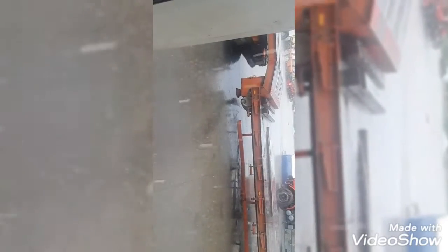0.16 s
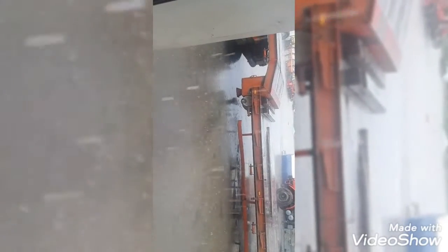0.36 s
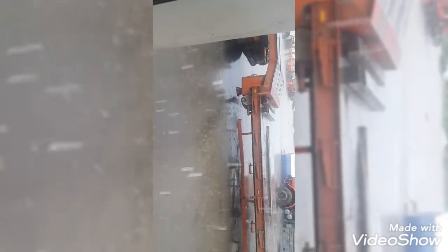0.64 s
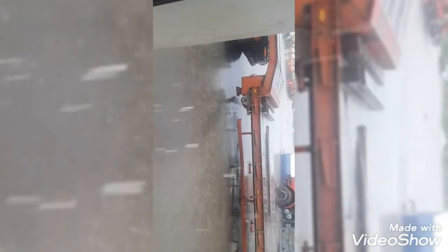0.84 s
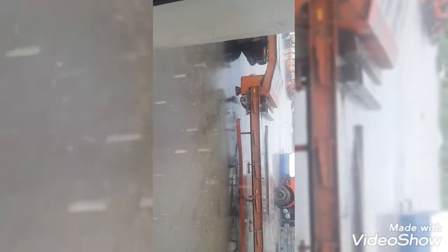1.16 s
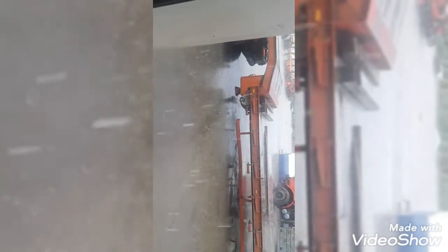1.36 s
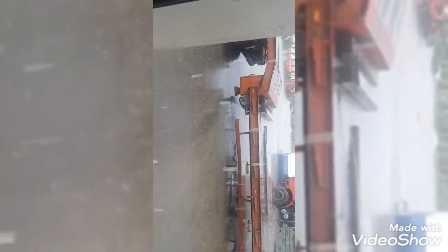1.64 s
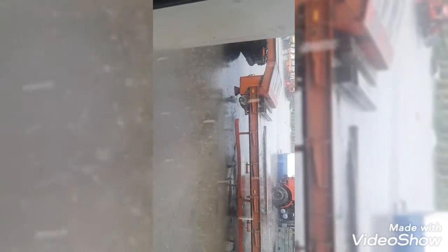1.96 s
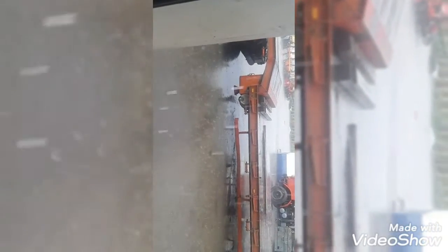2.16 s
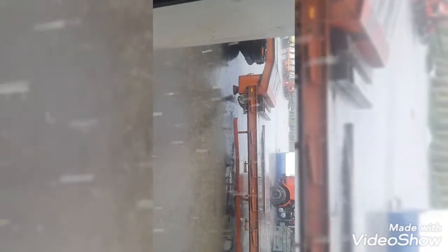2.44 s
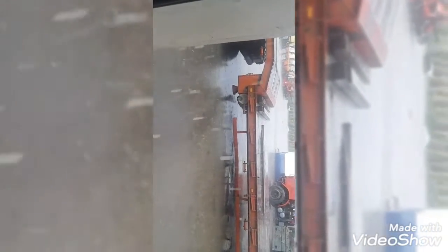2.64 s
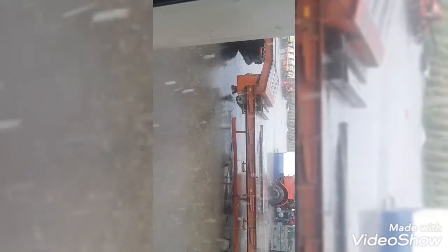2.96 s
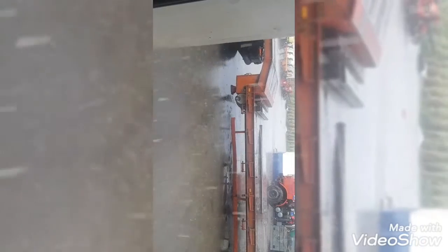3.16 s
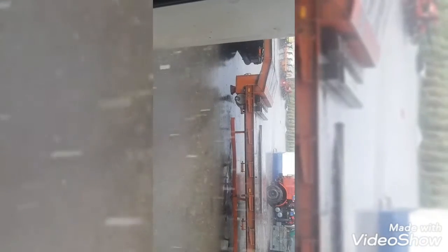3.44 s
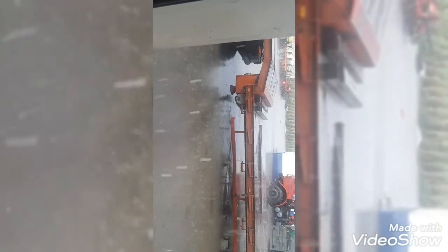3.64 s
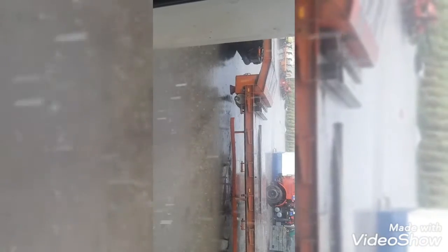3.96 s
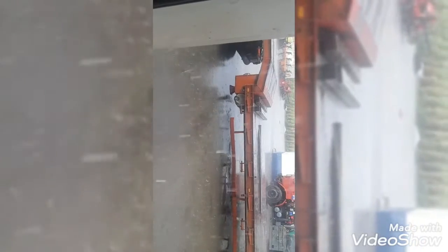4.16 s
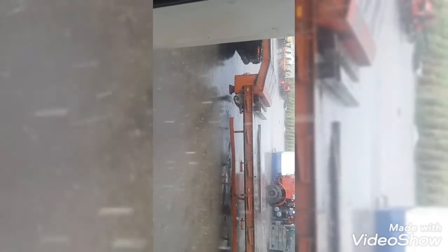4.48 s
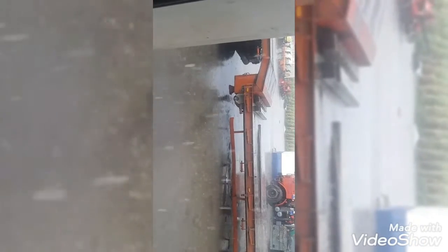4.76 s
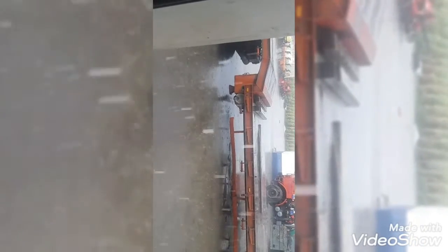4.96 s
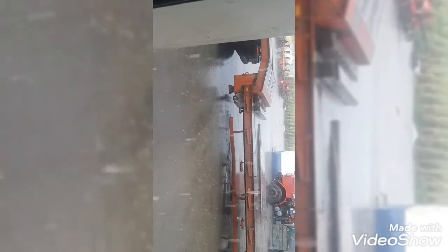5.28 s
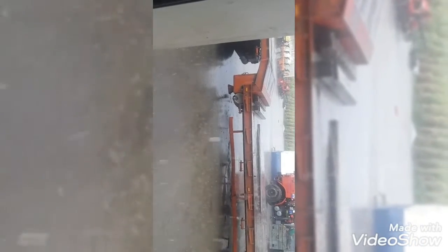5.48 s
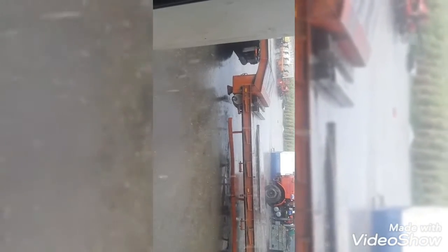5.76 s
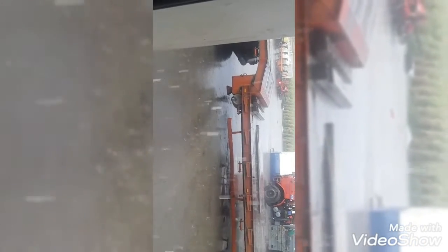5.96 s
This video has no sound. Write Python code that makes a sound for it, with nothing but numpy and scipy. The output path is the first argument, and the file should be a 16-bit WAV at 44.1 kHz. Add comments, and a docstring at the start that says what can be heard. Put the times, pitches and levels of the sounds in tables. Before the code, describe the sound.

A steady downpour hisses and patters across an open yard, dotted with crisp nearby drips and tiny puddle plinks.

```python
"""Heavy rain on wet paving and puddles in an open yard, heard by two microphones under a shelter.
Far drops merge into a wash; nearer ones patter as short splats; the nearest crack one by one.
Air trapped in the puddles rings as small bubbles. The downpour swells and slackens.
A few soft low thuds come through, and one heavy drop knocks on something hollow."""
import sys
import numpy as np
from scipy import signal
from scipy.fft import rfft, irfft
from scipy.io import wavfile
from scipy.ndimage import uniform_filter1d

SR = 44100
rng = np.random.default_rng(int(sys.argv[2]) if len(sys.argv) > 2 else 0)


def bounce(signal):
    """Save signal as a 16-bit WAV file at the path given by the first command-line argument."""
    frames = np.transpose(np.atleast_2d(signal))
    limited = np.clip(frames, -1, 1)
    pcm = np.round(limited * 32767).astype(np.int16)
    wavfile.write(sys.argv[1], SR, pcm)


N = 269892


def gain_of(db):
    return 10 ** (np.asarray(db) / 20)


def unit_rms(x):
    return x / np.sqrt(np.mean(x ** 2) + 1e-20)


def lookup(rows, at, column=1, log=True):
    """Interpolate a column: log axis for spectra, linear for time."""
    table = np.transpose(rows)
    warp = np.log1p if log else np.asarray
    return np.interp(warp(at), warp(table[0]), table[column])


def add(mix, start_s, sound):
    part = mix[..., max(round(start_s * SR), 0):][..., :sound.shape[-1]]
    part += sound[..., :part.shape[-1]]


# Each row: time in seconds, rain level in dB.
DOWNPOUR = [(0, -31), (0.3, -33.5), (0.8, -33.5), (0.97, -30.5), (1.25, -29), (1.7, -29), (2.15, -28),
            (2.55, -29.5), (2.9, -30), (3.5, -31), (4.1, -31.5), (4.7, -31), (5.1, -33), (5.78, -33.5),
            (5.95, -30.5), (6.12, -29.5)]

def downpour_db(t):
    """Swell and slackening shared by wash, patter and scattered bubbles."""
    return lookup(DOWNPOUR, t, log=False)


# Each row: frequency in Hz, gain in dB.
YARD_SPECTRUM = [(25, -26.5), (105, -25), (165, -6), (291, -0.5), (410, -2), (480, -5), (790, -5),
                 (1390, -6.5), (3100, -9), (4100, -7), (6000, -9), (7500, -13.5), (10500, -8),
                 (13200, -10.5), (15700, -9)]

def yard_colour(x, bass_cut_hz):
    """Spectrum of rain on the yard as the microphones hear it, with their dip near 7.5 kHz; the bass cut
    removes the roar that only far rain has."""
    hz = np.fft.rfftfreq(x.shape[-1], 1 / SR)
    bass_cut = 1 / np.sqrt(1 + (bass_cut_hz / (hz + 1)) ** 4)
    return irfft(rfft(x) * gain_of(lookup(YARD_SPECTRUM, hz)) * bass_cut, x.shape[-1])


# Each row: time in seconds, relative level of the low roar in dB.
LOW_ROAR = [(0.02, -42), (0.85, -43.5), (0.92, -39.5), (1.4, -36.5), (1.72, -39), (1.74, -38), (2.23, -37),
            (2.46, -40), (2.5, -42.5), (2.67, -39), (3.88, -41.5), (3.98, -39), (5.64, -44), (6.12, -41)]
# Spaced microphones, rain mostly on one side.
# Each row: frequency in Hz, coherence from 0 to 1, left phase lead in radians.
MIC_COHERENCE = [(50, .55, 0), (170, .88, 0), (320, .88, .1), (520, .42, 1.2), (1000, .5, 1.1),
                 (1280, .15, 2), (1550, .45, 3.3), (2500, .2, 6), (3300, .3, 9.6), (5200, .18, 15.7),
                 (16000, .05, 30)]

def far_wash(trim_db=1.6, patchy_db=2., flicker_db=1.1):
    """Countless far drops merge into patchy noise with a flickering treble."""
    frames, hz = N // 128 + 5, np.fft.rfftfreq(512, 1 / SR)
    t = np.arange(frames) * 128 / SR
    left_re, left_im, own_re, own_im, patches = rng.standard_normal((frames, 257, 5)).T
    patches = unit_rms(uniform_filter1d(uniform_filter1d(patches, 8, 0), 14, 1))
    landings = np.minimum(rng.exponential(1, frames), 2.5) ** 2
    flicker = unit_rms(signal.lfilter([1], [1, -.6], landings - landings.mean()))  # jumps, then sinks
    treble = (1 / (1 + (1500 / (hz + 1)) ** 2))[:, None]
    hiss_db, roar_db = downpour_db(t), lookup(LOW_ROAR, t, log=False)
    field_db = treble * hiss_db + (1 - treble) * (roar_db - roar_db.mean() + hiss_db.mean())
    field_db += patchy_db * (0.52 + 0.5 * treble) * patches + flicker_db * treble * flicker
    coherence = lookup(MIC_COHERENCE, hz)[:, None]
    lag = np.exp(-1j * lookup(MIC_COHERENCE, hz, column=2))[:, None]
    left = left_re + 1j * left_im
    right = coherence * lag * left + np.sqrt(1 - coherence ** 2) * (own_re + 1j * own_im)
    spectra = np.array([left, right]) * gain_of(field_db)
    noise = signal.istft(spectra, nperseg=512, noverlap=384)[1][:, :N]
    rain_rms = np.sqrt(np.mean(gain_of(hiss_db) ** 2))
    return gain_of(trim_db) * rain_rms * unit_rms(yard_colour(noise, bass_cut_hz=1))


def splat(hz, ring_share, noise, crack_ms, q, spray_ms=3., spray_db=-9., ring_ms=.9):
    """A drop bursts: a noisy crack around its pitch, a rising ring of the crater, then fine spray."""
    t = np.arange(noise.shape[-1]) / SR
    burst = noise * (np.exp(-1000 * t / crack_ms) + gain_of(spray_db) * np.exp(-1000 * t / spray_ms))
    crack = 0.26 * burst + signal.lfilter(*signal.iirpeak(min(hz, 15000), q, SR), burst)
    decay = np.exp(-1000 * t / ring_ms * (hz / 3000) ** 0.088)  # small, high craters die sooner
    crater = np.sin(2 * np.pi * hz * t * (1 + 15 * t)) * decay
    attack = np.minimum(t / 0.000082, 1)
    return ((1 - ring_share) * 2.1 * crack + ring_share * crater) * attack


def patter(trim_db=-2.2, per_s=750., spread_db=4.5, clumping=0.22, places=40):
    """Nearer drops in loose flurries, each place in the yard with its own pitch and delay."""
    flurry = uniform_filter1d(rng.standard_normal(N // 441 + 1), size=3)
    flurry = unit_rms(np.repeat(flurry, 441)[:N])
    falls = rng.random(N) < per_s / SR * np.exp(clumping * flurry)
    hits = gain_of(spread_db * np.minimum(rng.exponential(1, N), 2.3)) * falls
    place, out = rng.integers(0, places, N), np.zeros((2, N))
    for k, hz in enumerate(np.geomspace(2900, 15500, places)):
        noise = 2.4 * rng.standard_normal(700) + 1.44 * rng.standard_normal((2, 700))
        ring_share = rng.uniform(0.048, 0.47)
        pair = splat(hz, ring_share, noise, crack_ms=0.38, q=3., spray_db=-3.5)
        pair[1] = np.roll(pair[1], rng.integers(-4, 26))  # left mostly leads
        out += signal.oaconvolve((hits * (place == k))[None], pair, axes=1)[:, :N]
    level = gain_of(trim_db + downpour_db(np.arange(N) / SR))
    return level * unit_rms(yard_colour(out, bass_cut_hz=1260))


def bubble(hz, decay_cycles=4.):
    """Air trapped under a drop rings a few rising cycles."""
    t = np.arange(600) / SR
    envelope = np.exp(-t * hz / decay_cycles) * np.minimum(t / 0.00015, 1)
    return np.sin(2 * np.pi * hz * t * (1 + 12 * t)) * envelope


# Each row: start in seconds, level in dB, pitch in Hz.
CLOSE_BUBBLES = [(0.004, -15.5, 4400), (0.29, -41, 3480), (0.3792, -22, 2260), (2.2018, -20, 2870),
                 (2.397, -18.5, 2650), (2.9562, -16, 3560)]

def puddles(trim_db=-13., per_s=110., spread_db=2.5, places=24):
    """Drops trap bubbles in puddles all over the yard, a few of them close by."""
    sizes = gain_of(spread_db * np.minimum(rng.exponential(1, N), 2.2))
    hits = sizes * (rng.random(N) < per_s / SR)
    place, out = rng.integers(0, places, N), np.zeros((2, N))
    for k, hz in enumerate(np.geomspace(1900, 6000, places)):
        pair = np.array([bubble(hz), np.roll(bubble(hz), rng.integers(0, 24))])
        pair *= gain_of(rng.normal(0, 1.1) * np.array([[1], [-1]]))  # pan
        out += signal.oaconvolve((hits * (place == k))[None], pair, axes=1)[:, :N]
    out = gain_of(trim_db + downpour_db(np.arange(N) / SR)) * unit_rms(out)
    for start_s, db, hz in CLOSE_BUBBLES:
        add(out, start_s, gain_of(db) * bubble(hz))
    return out


# Each row: start in seconds, peak in dB, ring pitch in Hz, left minus right in dB, right lag in ms.
NEAR_DROPS = [(0.0414, -10, 4200, 3, 0.45), (0.1015, -15, 14000, -1, 0.2), (0.107, -13, 12500, -1, 0.2),
              (0.136, -17, 2200, 0, 0.1), (0.3172, -16, 3820, 0, 0.2), (0.3808, -16, 2380, 0, -0.09),
              (0.409, -15, 11000, -1, 0.2), (0.5194, -9, 9100, -4, 0.2), (0.7083, -14, 3530, 0, 0.2),
              (0.8711, -12, 3880, 1, 0.48), (0.907, -15, 12000, -1, 0.2), (1.0175, -16, 8000, -1, 0.2),
              (1.0374, -15, 6200, 0, 0.2), (1.0446, -16, 6040, -5, 0.0), (1.1047, -14, 11400, -2, 0.1),
              (1.1227, -13, 14600, -2, 0.14), (1.175, -7, 10150, -5, 0.11), (1.2504, -13, 9840, -3, 0.1),
              (1.3095, -13, 12000, -2, 0.16), (1.332, -12, 3960, 3, 0.43), (1.3525, -10, 9400, -2, -0.07),
              (1.3955, -12, 14200, -2, 0.14), (1.4916, -9, 6100, -8, 0.16), (1.5639, -15, 4530, -1, 0.2),
              (1.6709, -10, 3330, -1, 0.09), (1.7555, -10, 9300, 0, 0.27), (1.7712, -12, 5700, 0, 0.2),
              (1.7916, -5, 10770, -2, 0.23), (1.7938, -14, 4700, -2, 0.2), (1.8105, -14, 4300, 0, 0.2),
              (1.8235, -13, 4100, 0, 0.2), (1.9502, -12, 11020, -5, 0.09), (1.9815, -13, 3600, 0, 0.3),
              (1.9848, -9, 4200, 2, 0.48), (2.0185, -11, 10500, -2, 0.1), (2.063, -12, 11000, -2, 0.1),
              (2.1004, -12, 4000, 0, 0.48), (2.1238, -14, 4800, 0, 0.2), (2.1462, -14, 3600, 1, 0.2),
              (2.1545, -14, 3300, 0, 0.2), (2.1777, -6, 14130, -2, 0.14), (2.2012, -6, 3000, 0, 0.07),
              (2.2145, -14, 3900, 0, 0.2), (2.2455, -6, 2700, 0, 0.34), (2.2915, -13, 12500, -1, 0.16),
              (2.2878, -15, 4800, 0, 0.2), (2.295, -13, 3700, 0, 0.2), (2.3627, -12, 10900, -4, 0.0),
              (2.3938, -13, 13870, 0, 0.34), (2.4708, -8, 14380, -1, 0.45), (2.6277, -6, 6500, -2, 0.41),
              (2.6647, -14, 2500, -1, 0.32), (2.6946, -13, 5130, 3, 0.48), (2.71, -10, 10600, -2, 0.14),
              (2.8469, -14, 9220, -1, 0.27), (2.8746, -12, 11700, -1, 0.27), (2.9434, -11, 5600, -2, 0.48),
              (2.949, -16, 13000, -1, 0.2), (2.9558, -6, 3600, -1, 0.5), (2.9692, -16, 4100, 0, 0.2),
              (3.0171, -11, 13200, -3, 0.29), (3.1129, -14, 5730, 1, -0.02), (3.2907, -15, 4390, 0, -0.02),
              (3.3565, -15, 5630, -1, 0.2), (3.5516, -15, 4100, 0, 0.2), (3.7868, -16, 4000, 1, 0.07),
              (3.8704, -14, 4060, -1, 0.2), (3.8953, -11, 8500, -4, 0.11), (3.9236, -14, 10100, 0, 0.2),
              (3.9613, -7, 5000, -2, 0.05), (4.0408, -15, 10500, 0, 0.2), (4.0617, -13, 9600, 2, 0.34),
              (4.1356, -7, 14560, -1, 0.11), (4.2122, -11, 11300, -2, 0.18), (4.2225, -12, 4000, 0, 0.2),
              (4.254, -13, 13500, -1, 0.16), (4.3418, -14, 10000, -1, 0.2), (4.3722, -11, 11000, -2, 0.2),
              (4.391, -13, 9700, 0, 0.2), (4.5089, -14, 14000, -1, 0.2), (4.5668, -13, 11500, 0, 0.2),
              (4.5838, -12, 13000, -2, 0.16), (4.5851, -11, 4000, -1, 0.18), (4.6288, -14, 9500, 0, 0.2),
              (4.7033, -11, 2900, -1, 0.09), (4.7242, -4, 10000, -3, 0.16), (4.8855, -14, 7500, 0, 0.2),
              (4.9594, -17, 3760, 0, 0.2), (4.9833, -14, 11020, 3, 0.05), (5.0721, -15, 4390, 2, 0.29),
              (5.2155, -12, 5900, 0, 0.27), (5.2653, -10, 3400, -2, 0.09), (5.337, -15, 12000, -1, 0.16),
              (5.4682, -11, 8000, -4, 0.11), (5.5212, -11, 5300, -2, 0.38), (5.5695, -16, 4430, -1, 0.2),
              (5.6847, -15, 4330, -1, 0.2), (5.7025, -15, 10500, -4, 0.16), (5.7216, -14, 3710, 0, 0.2),
              (5.776, -13, 6030, 2, 0.32), (5.8729, -11, 10940, -2, 0.16), (5.9202, -10, 12320, -1, 0.16),
              (5.9085, -14, 2600, 0, 0.2), (5.9355, -11, 12500, -1, 0.16), (6.056, -8, 12230, -4, 0.32)]

def near_drops():
    """The nearest drops: a sharp blow and splat, reaching the microphones slightly apart."""
    out, noises = np.zeros((2, N)), rng.standard_normal((len(NEAR_DROPS), 3, 700))
    blow = 3.5 * signal.unit_impulse(700, idx=8)
    pad = 100
    for (start_s, db, hz, pan_db, lag_ms), noise in zip(NEAR_DROPS, noises):
        impact = blow + 0.6 * noise[0] + 0.6 * noise[1:]
        drop = splat(hz, ring_share=.33, noise=impact, crack_ms=.65, q=1.9, ring_ms=.65)
        pair = yard_colour(np.pad(drop, ((0, 0), (pad, 224))), bass_cut_hz=1960)
        pair /= abs(pair).max(1, keepdims=True)
        pair *= gain_of(db + np.array([[.5], [-.5]]) * pan_db)
        add(out[0], start_s - pad / SR, pair[0])
        add(out[1], start_s - pad / SR + lag_ms / 1000, pair[1])
    return out


# Each row: start in seconds, peak in dB.
THUDS = [(0.085, -60), (0.876, -46), (2.255, -49), (2.954, -44), (3.539, -47), (3.923, -66), (4.711, -48)]

def thuds(cutoff_hz=110., rise_s=0.019):
    """Soft puffs of deep bass noise, partly shared by the microphones."""
    out, t = np.zeros((2, N)), np.arange(6000) / SR
    lowpass = signal.butter(2, cutoff_hz, fs=SR, output="sos")
    for (start_s, db), noise in zip(THUDS, rng.standard_normal((len(THUDS), 3, 6000))):
        puff = signal.sosfilt(lowpass, noise[0] + 0.73 * noise[1:]) * t * np.exp(-t / rise_s)
        add(out, start_s, gain_of(db) * puff / abs(puff).max())
    return out


# Each row: start in seconds, level in dB.
KNOCKS = [(1.169, -16.5)]

def hollow_knock(low_hz=400, high_hz=1450):
    """A heavy drop on something hollow rings two brief modes."""
    out, t = np.zeros((2, N)), np.arange(6000) / SR
    modes = np.sin(2 * np.pi * low_hz * t) + 0.62 * np.sin(2 * np.pi * high_hz * t)
    envelope = (t / 0.0016) * np.exp(1 - t / 0.00086)
    highpass = signal.butter(2, 150., "high", fs=SR, output="sos")  # too small to boom
    knock = signal.sosfilt(highpass, modes * envelope)
    for start_s, db in KNOCKS:
        add(out, start_s, gain_of(db) * knock)
    return out


def scene():
    return far_wash() + patter() + puddles() + near_drops() + thuds() + hollow_knock()


# Each row: frequency in Hz, left minus right in dB.
MIC_BALANCE = [(130, -1), (330, 1.5), (800, -2), (1400, -1.5), (4000, 0.5), (8500, -2), (14000, 0)]

def record(dry):
    """Two band-limited microphones, each with a slight colour of its own."""
    tilt_db = lookup(MIC_BALANCE, np.fft.rfftfreq(N, 1 / SR)) * np.array([[.5], [-.5]])
    heard = irfft(rfft(dry) * gain_of(tilt_db), N)
    lowpass = signal.firwin(1201, cutoff=15780, window=("kaiser", 9), fs=SR)
    return signal.oaconvolve(heard, lowpass[None], "same")


dry = scene()
out = record(dry)
bounce(out)
```